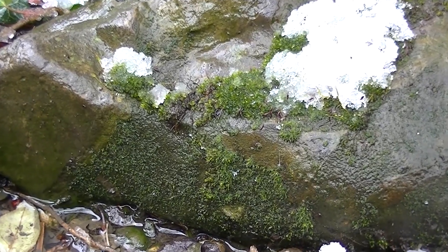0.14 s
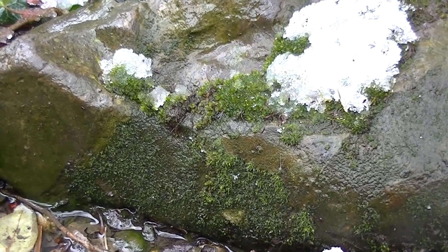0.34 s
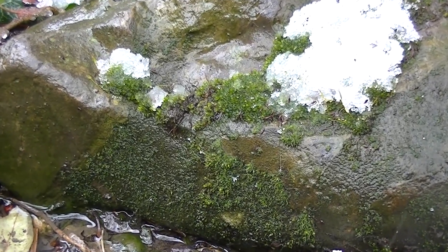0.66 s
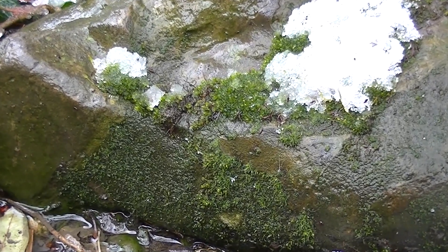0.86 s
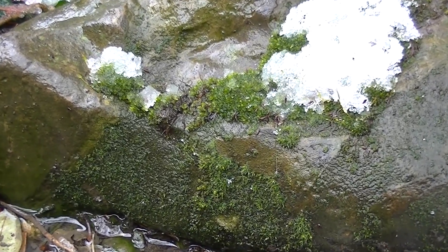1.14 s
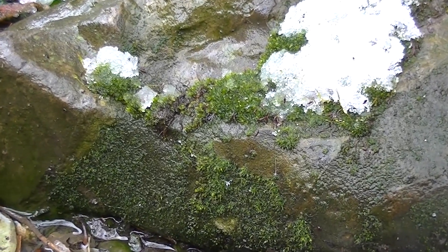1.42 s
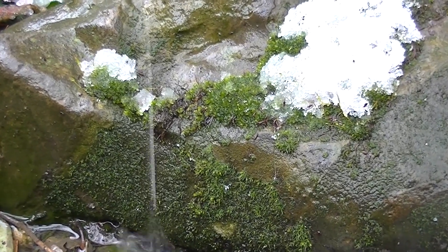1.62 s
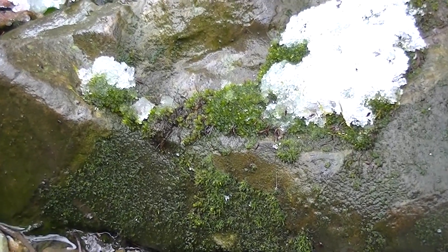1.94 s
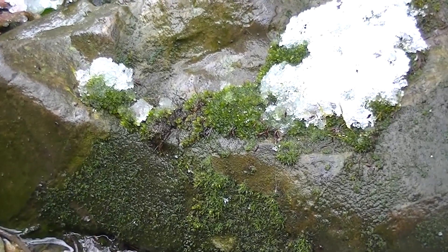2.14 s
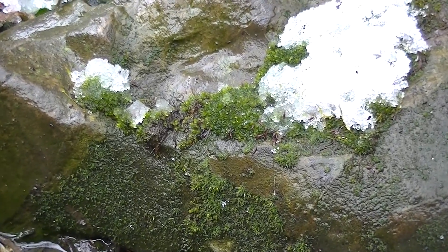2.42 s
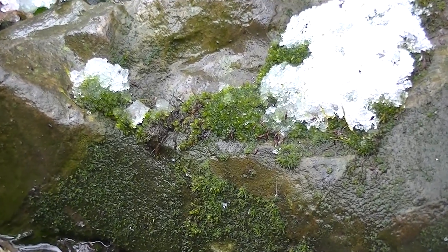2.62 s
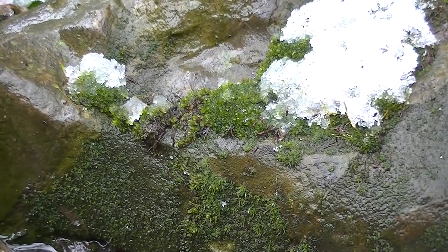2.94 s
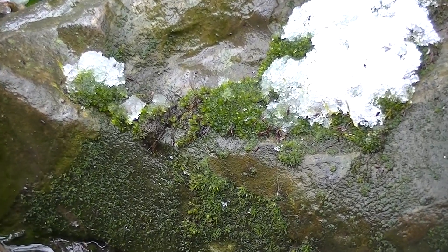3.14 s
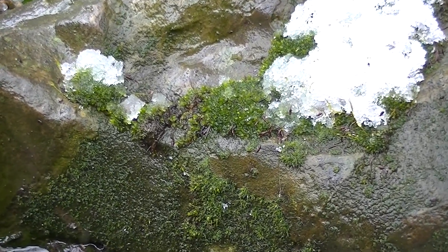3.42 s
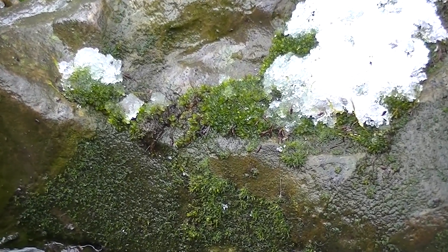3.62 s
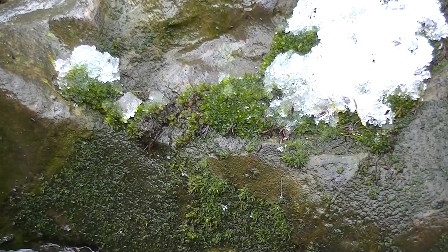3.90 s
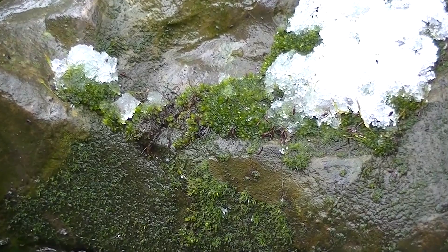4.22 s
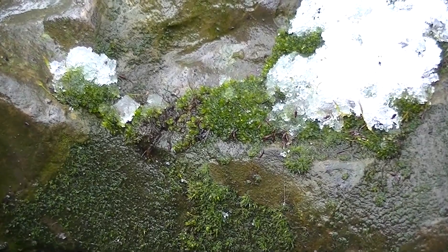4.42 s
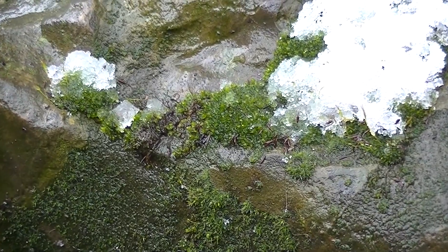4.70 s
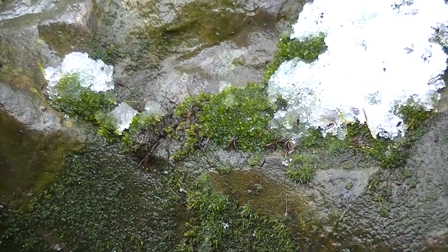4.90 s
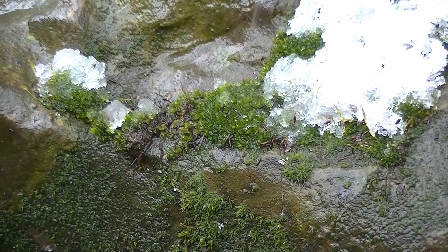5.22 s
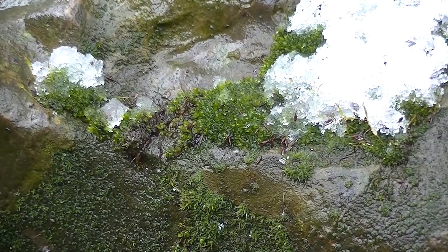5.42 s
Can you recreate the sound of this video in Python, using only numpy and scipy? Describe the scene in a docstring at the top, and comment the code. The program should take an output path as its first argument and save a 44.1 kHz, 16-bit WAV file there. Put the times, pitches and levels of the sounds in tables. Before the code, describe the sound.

Close stereo pickup of water dripping outdoors onto wet stone, moss and shallow puddles. Crisp irregular taps with tiny spatters crowd together, mixed with short plops and ringing bubbles. A fine trickle runs continuously underneath. A thin high bird peep comes at the right near the start and again late, and the heaviest drops land in the last second and a half.

```python
"""Sharp wet drops patter on stone, moss and shallow puddles in a garden hollow, for five and a half seconds.
Each drop is a crack of clicks through resonances with a spatter behind; dying sines add plops and rings.
Showers of clicks splash and boom in the hollow; banded clicks make the fine trickle below.
A small bird calls twice in gliding sines, narrow noise whines faintly, and filtered noise rumbles far off."""
import sys
import numpy as np
from scipy import signal
from scipy.io import wavfile

SR = 44100
rng = np.random.default_rng(int(sys.argv[2]) if len(sys.argv) > 2 else 0)


def store_wav(level_fs):
    """Save 16-bit WAV to argv[1]."""
    pcm = np.round(np.clip(np.atleast_2d(level_fs), -1, 1) * 32767)
    wavfile.write(sys.argv[1], SR, pcm.T.astype(np.int16))


def elevation(decibels):
    """Turn decibel levels (scalar or array-like) into linear amplitude ratios."""
    levels = np.asarray(decibels, float)
    return 10 ** (levels / 20)


N = 244755   # length in samples


def rms_one(x):
    """Scale to rms 1."""
    return x / np.sqrt(np.mean(x ** 2) + 1e-20)


def at_hz(points, hz):
    """Read a (Hz, value) table on a log-frequency axis."""
    table_hz, values = np.transpose(points)
    return np.interp(np.log(hz), np.log(table_hz), values)


def drift(rate_hz):
    """Smoothed chance of spread 1: noise through two equal poles, made at every 40th sample."""
    r = np.exp(-2 * np.pi * rate_hz * 40 / SR)
    noise = rng.standard_normal(N // 40 + 2002)
    slow = signal.lfilter([1], [1, -2 * r, r * r], noise)[2000:]   # skip the filter's start
    slow = rms_one(slow - slow.mean())
    return np.interp(np.arange(N) / 40, np.arange(len(slow)), slow)


def grains(per_s, spread_db, channels):
    """Random clicks of uneven size and sign; rms 1."""
    size_db = spread_db * np.minimum(rng.exponential(1, (channels, N)), 4)
    signs = rng.choice([-1, 1], (channels, N))
    falls = rng.random((channels, N)) < per_s / SR
    return rms_one(elevation(size_db) * signs * falls)


def resonance(x, hz, width_hz):
    """Two-pole peak that keeps the power of white noise."""
    r = np.exp(-np.pi * width_hz / SR)
    feed = np.sqrt((1 - r * r) / 2) * np.array([1, 0, -1])
    return signal.lfilter(feed, [1, -2 * r * np.cos(2 * np.pi * hz / SR), r * r], x)


def dying(clicks, decay_s):
    """Every click starts an envelope that falls off exponentially."""
    return signal.lfilter([1], [1, -np.exp(-1 / (decay_s * SR))], clicks + 1e-18)


# how alike left and right are across the spectrum: pitch_hz, likeness (1 = identical)
LEFT_RIGHT_LIKENESS = [(60, 1), (500, 0.94), (2000, 0.98), (8000, 0.88), (14000, 1)]


def pair(mid_side, hz):
    """Left and right, as alike as close microphones make them at this pitch."""
    alike = np.clip(at_hz(LEFT_RIGHT_LIKENESS, hz), -1, 1)
    mid, side = mid_side
    polarity = np.array([[1], [-1]])
    return np.sqrt((1 + alike) / 2) * mid + np.sqrt((1 - alike) / 2) * side * polarity


def banded(source, spectrum, patchy_db):
    """Half-octave bands, each with its own level, flickering partly together and partly alone; rms 1."""
    out, together = 0, drift(12.0)
    edges = 22 * 2 ** np.arange(0, 9.6, 0.5)
    for k, (low, high) in enumerate(zip(edges, edges[1:])):
        hz = np.sqrt(low * high)
        if spectrum[0][0] < hz < spectrum[-1][0]:
            sos = signal.butter(2, [low, high], "band", fs=SR, output="sos")
            band = signal.sosfilt(sos, source[k % 2])
            flicker_db = patchy_db * (0.71 * together + drift(12.2))
            out = out + elevation(at_hz(spectrum, hz) + flicker_db) * pair(band, hz)
    return rms_one(out)


# the clearer drops: start_s, thump_db, slap_db, tick_db, spatter_db (against the crack)
CLEAR_DROPS = [(0.011, -34.5, -29, -41, -8), (0.062, -37, -32, -26.5, -11), (0.0717, -37, -54, -47, -29),
               (0.0889, -32, -39, -55, -15), (.097, -55, -52, -35, -22), (0.2433, -46, -45, -62, 3),
               (0.3647, -37.5, -44, -38, -4), (.411, -44, -46, -33, 3.5), (.416, -51, -27.5, -36, -6),
               (0.4406, -48, -31, -35, -12), (.454, -38.5, -54, -34, -17), (0.5723, -40.5, -39, -38, -19),
               (.5969, -62, -51, -36.5, -24), (0.6401, -47, -45, -35, -10), (0.6976, -56, -33, -40, -25),
               (0.7012, -51, -24.5, -26, -13), (0.7344, -34, -26.5, -49, -11.5),
               (.7594, -50, -34.5, -51, -30), (0.8064, -43.5, -37, -31.5, -4.5),
               (0.862, -49, -35, -38, -28), (.928, -39, -28, -51, -12), (1.011, -51, -41.5, -59, 3.5),
               (1.0479, -61, -42, -36.5, -1), (1.255, -39, -41, -32.5, -29), (1.32, -35, -40, -26, -17),
               (1.351, -64, -41, -27.5, -8), (1.3631, -60, -47, -32.5, -13), (1.4385, -32, -32, -59, -10.5),
               (1.4429, -42, -26.5, -27, -8), (1.4497, -36, -33.5, -32, -11), (1.523, -56, -48, -33, 1.5),
               (1.552, -47, -38, -57, -23), (1.6839, -50, -41, -23.5, -15), (1.7433, -38, -34, -31.5, -11),
               (1.7699, -37.5, -31, -35.5, -11), (1.7977, -57, -33, -59, -10), (1.812, -47, -43, -37, -2.5),
               (1.8313, -36, -46, -46, -5), (2.0018, -53, -41, -62, 3), (2.048, -34.5, -31.5, -36, -4),
               (2.099, -53, -62, -38, 2.5), (2.11, -45, -40, -23, -15), (2.226, -31, -18.5, -21, -24),
               (2.2985, -63, -39, -32, -8), (2.4837, -45, -34.5, -43, -9), (2.516, -38.5, -35, -53, -31),
               (2.5727, -46.5, -42.5, -40, 2), (2.615, -32, -34, -20, -34), (2.7852, -41, -36.5, -39, -6),
               (2.9133, -46, -33.5, -36.5, -21), (2.989, -45.5, -39.5, -46, 9),
               (3.044, -40, -34.5, -44, -5), (3.0769, -35.5, -37, -55, -6.5),
               (3.115, -37.5, -37, -38.5, -12), (3.1482, -37, -50, -35, -14), (3.228, -53, -58, -34.5, 4),
               (3.2328, -31, -28.5, -42, -19), (3.3875, -45.5, -39, -30, 0.5),
               (3.4569, -39, -28, -25.5, -11.5), (3.473, -52, -30, -55, -14), (3.51, -68, -61, -35.5, 2.5),
               (3.621, -62, -55, -27.5, -14), (3.6333, -44, -37.5, -25, -2.5),
               (3.707, -34.5, -37, -56, -20), (3.8748, -68, -53, -37.5, 3), (3.9136, -57, -40, -42, 2),
               (4.0661, -30.5, -31, -38, -14), (4.075, -49, -32, -35.5, -15), (4.17, -41, -37.5, -48, -23),
               (4.2598, -53, -51, -24.5, -1), (4.2698, -35.5, -14, -16, -19), (4.353, -56, -51, -32.5, -5),
               (4.3812, -37, -43, -56, -26), (4.422, -44.5, -39, -36, -0.5), (4.4345, -33.5, -31, -53, -22),
               (4.448, -37, -35, -38, -29), (4.497, -62, -53, -35, -6), (4.518, -46, -38.5, -40.5, 3),
               (4.552, -62, -44, -35, -14), (4.5712, -62, -46, -33, -24), (4.6133, -41.5, -44, -33, -4),
               (4.7089, -44, -30, -26.5, -5), (4.769, -69, -40, -68, -2), (5.0421, -23, -13.5, -37, -7.5),
               (5.0515, -48, -47, -40, -18), (5.0985, -30, -33, -33, -26), (5.1467, -40, -37, -51, -7),
               (5.1556, -55, -51, -33, -25), (5.1592, -45, -29, -32, -34), (5.1957, -52, -51, -34.5, -6),
               (5.2213, -41, -31.5, -53, -17), (5.239, -39, -41, -32, -10.5), (5.2466, -49, -30, -20, -16),
               (5.281, -57, -56, -35.5, -24), (5.312, -43, -34, -48, -3.5), (5.33, -54, -43, -41, 7.5),
               (5.411, -55, -28.5, -29, -19), (5.422, -23.5, -30, -40, -11), (5.455, -43, -44, -55, -31),
               (5.4884, -55, -44, -38, -16), (5.5252, -38.5, -32, -38, -4.5)]
# what thump, slap and tick (one list each) ring with:
# pitch_hz, width_hz (of the first of two passes), level_db (against the contact)
CONTACT_MODES = [
    [(443, 630, -2.5), (920, 1020, -4), (1600, 1020, 1.5), (2144, 550, -2.5)],
    [(2770, 1030, -5.5), (4300, 940, -3.5), (5440, 1300, -5)],
    [(6500, 2060, -2.5), (8400, 2300, -4.5), (9600, 5500, -9)],
]


def drops():
    """A sharp front, a few ms of tearing film, then droplets falling back; every drop has its own colour."""
    crack_decay_s, spatter_decay_s = 0.0021, 0.02
    # faint drops fall at random: mean and spread of thump, slap, tick, spatter in dB
    faint_count, faint_db, faint_spread_db = 70, (-47.5, -48.5, -43, -11), (3.8, 3.3, 1.7, 1.7)
    colour_spread_db, faint_colour_spread_db = 1.7, 4.5   # faint drops differ more in colour
    faint_s = rng.random(faint_count) * (N - 1) / SR
    vary = np.clip(rng.standard_normal((faint_count, 4)), -2, 2)
    faint = np.column_stack([faint_s, faint_db + np.multiply(faint_spread_db, vary)])
    rows = np.vstack([faint, CLEAR_DROPS])
    start = (rows[:, 0] * SR).astype(int)

    colour_db = colour_spread_db * rng.standard_normal((len(rows), 3, 4))
    colour_db[:faint_count] *= faint_colour_spread_db / colour_spread_db
    # drops on the bare stone at the right have little thump, so bright drops lean right
    dullness_db = rows[:, 1] - rows[:, 2:4].max(axis=1)
    left_db = 0.0378 * dullness_db + 1.0 * rng.standard_normal(len(rows))

    film, droplets = grains(14000, 5.2, channels=4), grains(8000, 2.9, channels=4)
    out = np.zeros((2, N))
    for part, modes in enumerate(CONTACT_MODES):
        for k, (hz, width_hz, mode_db) in enumerate(modes):
            strength, spatter = np.zeros((2, N))
            strength[start] = elevation(rows[:, 1 + part] + mode_db + colour_db[:, part, k])
            # droplets are duller than the crack
            spatter[start] = strength[start] * elevation(rows[:, 4]) / (1 + (hz / 8000) ** 2)
            which = slice(k % 2, 4, 2)   # neighbouring modes get separate grains
            push = dying(strength, crack_decay_s) * film[which]
            push += dying(spatter, spatter_decay_s) * droplets[which]
            # alternate signs keep the front whole between resonances
            push[0] -= 5.63 * (-1) ** (k + (part > 1)) * strength
            ring = resonance(resonance(push, hz, width_hz), hz, 1.75 * width_hz)
            out += pair(ring * np.sqrt(width_hz / SR) * 2.603, hz)

    # the whole layer takes the newest drop's place, switching just ahead of its contact
    order = np.argsort(start)
    newest = np.searchsorted(start[order], np.arange(N) + 10) - 1
    latest = order[np.clip(newest, 0, None)]
    return out * elevation(np.outer([0.5, -0.5], left_db))[:, latest]


# short plops and ringing bubbles: start_s, level_db (amplitude before the decay), pitch_hz (at the start),
# rise_octaves_per_s, decay_s
PLOPS_AND_BUBBLES = [(0.071, -31, 2020, 0.8, 0.0093), (0.4216, -15.5, 2750, 8, 0.00098),
                     (0.433, -26.5, 225, 3, 0.01), (0.5343, -35.5, 1010, 27, 0.0065),
                     (0.5555, -31.5, 1360, 16, 0.015), (.577, -34, 2380, 8, .005),
                     (1.3213, -26.5, 523, 4, 0.0028), (1.7557, -31, 1680, 2, 0.0061),
                     (1.8296, -27.5, 488, 20, 0.0036), (1.8791, -21, 800, 10, 0.0024),
                     (2.05, -24, 1750, 8, 0.003), (2.9128, -27, 206, 4, 0.0038),
                     (2.986, -28.5, 1600, 4, 0.0053), (2.9917, -28.5, 1640, 8.9, .005),
                     (3.0596, -32.5, 656, 3.5, 0.011), (3.0762, -19.5, 3600, 1, 0.0043),
                     (3.1429, -34, 795, 6, 0.0067), (3.625, -31.5, 266, 8.7, 0.0064),
                     (3.705, -38, 794, 1.9, 0.017), (3.783, -28.5, 176.5, 4.5, 0.012),
                     (3.796, -22, 169, 4.4, 0.0075), (3.84, -30, 260, 2, 0.006),
                     (3.8682, -31.5, 295, 4.9, 0.022), (4.27, -19.5, 310, 2, 0.0016),
                     (4.3798, -25, 776, 4, 0.0014), (4.4194, -25.5, 730, 4, 0.0026),
                     (4.6239, -20, 950, 26, 0.0024), (4.897, -34.5, 1244, 8, 0.0075),
                     (5.1608, -27, 4370, 2, 0.0041), (5.421, -17.5, 305, 2, 0.0019),
                     (5.4218, -7, 1230, 2, 0.00083), (5.439, -20, 228, 2, 0.0074),
                     (5.4509, -19, 235, 2, 0.0076), (5.483, -31, 232, 2, 0.014),
                     (5.518, -33, 1100, 5.5, 0.0017)]


def plops_and_bubbles():
    """A dying sine, from a brief plop to a longer ring, its pitch rising."""
    out, t = np.zeros(N + SR), np.arange(SR // 8) / SR
    for start_s, level_db, hz, rise, decay_s in PLOPS_AND_BUBBLES:
        phase = 2 * np.pi * np.cumsum(hz * 2 ** (rise * t)) / SR
        swell = np.exp(-t / decay_s) * (1 - np.exp(-t * hz * 5.0))
        start = int(start_s * SR)
        out[start:start + len(t)] += elevation(level_db) * swell * np.sin(phase)
    return out[:N]


# larger gushes that break up on the stone: start_s, span_s (the tail ends after 1.5 spans),
# pitch_hz (centre), level_db (rms before the swell)
STONE_SPLASHES = [(0.002, 0.018, 3500, -48), (.435, 0.098, 6500, -36.5), (0.704, .07, 5030, -38),
                  (1.443, 0.028, 2500, -49), (1.877, 0.062, 630, -44), (2.177, 0.056, 5370, -40),
                  (2.993, 0.22, 730, -44), (2.99, 0.13, 2800, -42), (3.33, 0.078, 740, -38.5),
                  (3.64, 0.12, 6000, -45), (3.801, 0.17, 413, -39.5), (4.388, 0.07, 784, -50),
                  (4.721, 0.17, 3660, -41.5), (4.922, 0.05, 5950, -38), (5.052, 0.088, 3020, -43),
                  (5.328, 0.093, 5640, -38.5), (5.425, 0.076, 450, -41.5)]
# water booms in the hollow under the stone: start_s, span_s (as above), level_db (rms before the swell)
HOLLOW_BOOMS = [(0.442, 0.15, -49.5), (3.794, 0.19, -45), (3.94, 0.41, -48), (5.459, 0.085, -44)]


def splashes():
    """A dense shower of droplets that swells fast and ebbs, coloured by the hollow it falls into."""
    hollow_hz, hollow_width_hz = 249, 88
    out, shower = np.zeros((2, N + SR)), grains(6000, 1.75, channels=2)
    gushes = []
    for start_s, span_s, hz, level_db in STONE_SPLASHES:
        width_hz = 810 * (hz / 1000) ** 0.55   # higher splashes are narrower for their pitch
        gushes.append((start_s, span_s, hz, width_hz, level_db))
    for start_s, span_s, level_db in HOLLOW_BOOMS:
        gushes.append((start_s, span_s, hollow_hz, hollow_width_hz, level_db))
    for k, (start_s, span_s, hz, width_hz, level_db) in enumerate(gushes):
        start = int(max(start_s, 0) * SR)
        u = np.arange(int(1.5 * span_s * SR)) / (span_s * SR)   # time in spans
        swell = np.clip(u / 0.17, 0, 1) * np.cos(np.pi * u / 3) ** 3.0
        stretch = np.roll(shower, 9973 * k, axis=1)[:, :len(u)]   # shift the shower for each gush
        coloured = resonance(resonance(stretch, hz, width_hz), hz, 2 * width_hz)
        out[:, start:start + len(u)] += elevation(level_db) * swell * pair(rms_one(coloured), hz)
    return out[:, :N]


# the flow over time: time_s, flow_db, fineness_db (raises the spray and lowers the gurgle)
WATER_FLOW = [(0, -50, 5), (.32, -49, -4), (.83, -50.5, 1.5), (1.19, -49.5, -2), (1.56, -50, 1),
              (1.88, -51, -0.5), (2.35, -47.5, -0.5), (3.09, -50, -1), (3.35, -50.5, 1), (3.57, -47, -1),
              (3.88, -47.5, -3.5), (4.13, -51.5, 2), (4.47, -49, 1), (4.78, -48.5, -3), (5.19, -46, 0.5),
              (5.55, -52.5, 1)]
# spectra of the three parts: pitch_hz, level_db (per Hz, relative)
GURGLE_SPECTRUM = [(120, 0.5), (250, 1.5), (600, -3), (1200, -4), (2200, -19)]
TRICKLE_SPECTRUM = [(500, -43), (1300, -3.5), (2500, 3.5), (4500, 1), (7000, -6)]
SPRAY_SPECTRUM = [(2500, -14), (5000, 4.5), (7000, -1), (10000, -6), (15000, -14)]


def running_water():
    """Countless small drops and rivulets, coarse in the low part and fine in the spray."""
    time_s, *controls = np.transpose(WATER_FLOW)
    flow_db, fine_db = [np.interp(np.arange(N) / SR, time_s, c) for c in controls]
    shape = (2, 2, N)   # two alternating sources, each mid and side
    gurgle = banded(grains(500, 3.8, channels=4).reshape(shape), GURGLE_SPECTRUM, patchy_db=1.9)
    trickle = banded(grains(2000, 2.76, channels=4).reshape(shape), TRICKLE_SPECTRUM, patchy_db=2.5)
    spray = banded(grains(2500, 3.1, channels=4).reshape(shape), SPRAY_SPECTRUM, patchy_db=2.0)
    spray = spray * elevation([[-0.6], [0.6]])   # leans right
    return elevation(flow_db) * (elevation(-2.5 - fine_db) * gurgle + trickle + elevation(-2 + fine_db) * spray)


# two bird calls, one list of glide points each:
# time_s, pitch_hz, level_db (rms before the reflection, echo and panning)
BIRD_CALLS = [
    [(.284, 7350, -48), (.29, 7700, -38), (.297, 7740, -40), (.308, 7700, -29), (.322, 7630, -21),
     (.329, 7630, -29), (.337, 7600, -38), (.341, 7580, -48)],
    [(4.577, 7150, -48), (4.582, 7650, -39), (4.588, 7880, -33), (4.602, 7760, -29), (4.61, 7380, -31),
     (4.62, 6900, -33), (4.625, 6750, -44)],
]


def bird():
    """Thin gliding whistles from the right, with a near reflection and a blurred echo from leaves and walls."""
    t, out = np.arange(N) / SR, np.zeros(N)
    for call in BIRD_CALLS:
        time_s, hz, level_db = np.transpose(call)
        fade = np.clip(np.minimum(t - time_s[0], time_s[-1] - t) / 0.0011, 0, 1)
        phase = 2 * np.pi * np.cumsum(np.interp(t, time_s, hz)) / SR
        out += np.sqrt(2) * fade * elevation(np.interp(t, time_s, level_db)) * np.sin(phase)
    out += elevation(-14) * np.roll(out, int(0.0051 * SR))   # near reflection
    tail = np.arange(SR // 8) / SR
    scatter = rng.standard_normal((2, len(tail))) * np.exp(-tail / 0.041)
    echo = signal.fftconvolve(out[None], scatter, axes=1)[:, :N]
    return (out + elevation(-41.5) * echo) * elevation([[-1.6], [1.4]])


# the faint tone and its octave: pitch_hz, level_db (rms before the throb)
WHINE_TONES = [(1599, -64.5), (3200, -61.5)]


def whine():
    """Noise through narrow resonances: a faint tone and its octave, coming and going together."""
    throb = elevation(4.8 * drift(57.0))
    out = 0
    for hz, level_db in WHINE_TONES:
        tone = rms_one(resonance(rng.standard_normal(N), hz, 24.0))
        out = out + elevation(level_db) * throb * tone
    return out


# spectrum of the distant rumble and air: pitch_hz, level_db (per Hz, relative)
AIR_SPECTRUM = [(15, -37), (25, -2), (80, 9.5), (180, 7.5), (476, -10.5), (796, 4), (1100, -26), (1560, 6),
                (1740, -10.5), (3160, -11), (8140, -34), (14000, -22), (16000, -33)]


def distant_air():
    """Flickering bands of noise, heaviest in the low rumble."""
    return elevation(-51) * banded(rng.standard_normal((2, 2, N)), AIR_SPECTRUM, patchy_db=2.5)


def scene():
    """All sources at the microphones."""
    water = drops() + plops_and_bubbles() + splashes() + running_water()
    return water + bird() + whine() + distant_air()


def roll_off(x):
    """The treble ends steeply here."""
    return signal.sosfilt(signal.butter(12, 16810, fs=SR, output="sos"), x)


def record(dry):
    """A steep low-pass takes off the top, 70 dB down from 16900 Hz."""
    low_pass = signal.cheby2(12, 70, 16900, fs=SR, output="sos")
    mix = signal.sosfilt(low_pass, dry)
    return roll_off(mix)


dry = scene()
out = record(dry)
store_wav(out)
```